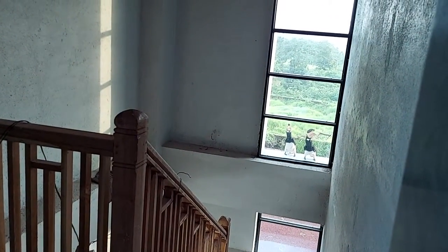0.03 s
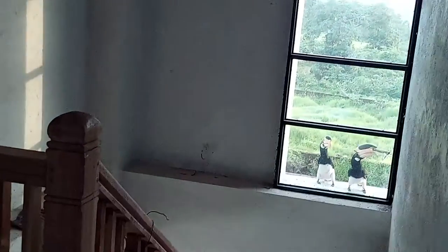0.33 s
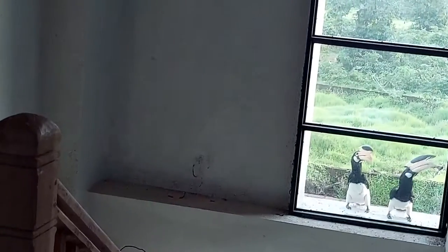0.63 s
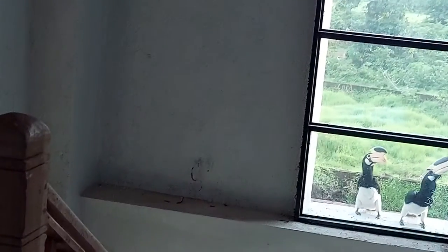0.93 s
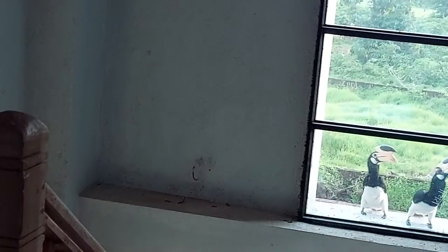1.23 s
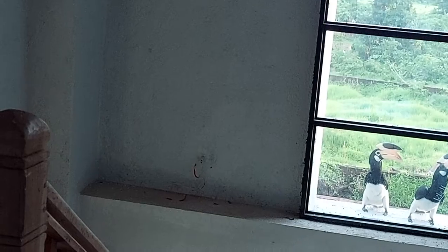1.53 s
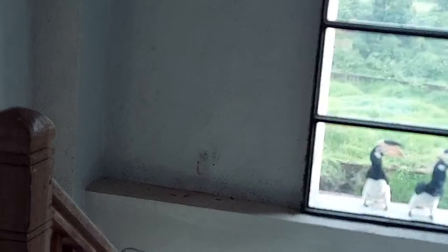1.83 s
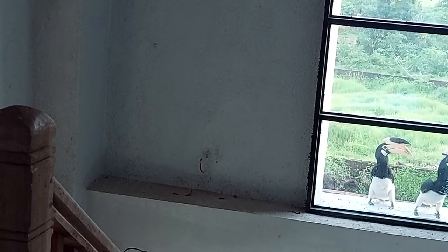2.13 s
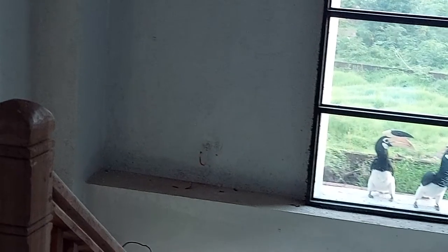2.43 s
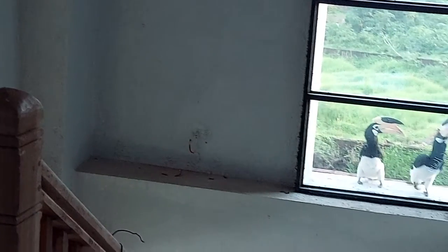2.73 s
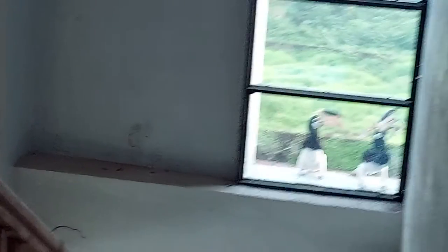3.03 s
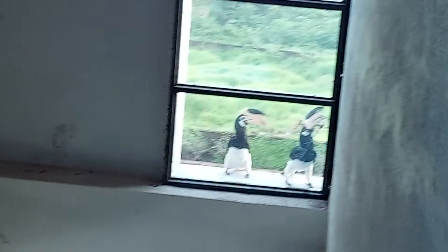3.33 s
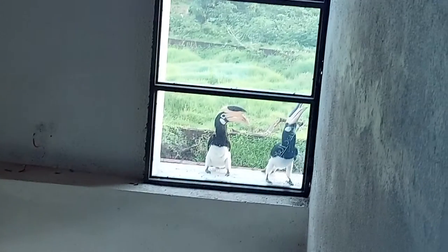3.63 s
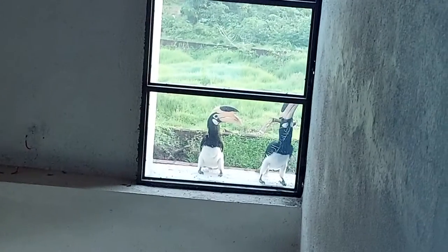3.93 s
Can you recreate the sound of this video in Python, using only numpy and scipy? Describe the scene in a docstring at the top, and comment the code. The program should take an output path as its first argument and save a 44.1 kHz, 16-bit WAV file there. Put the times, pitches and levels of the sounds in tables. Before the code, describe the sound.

Booming thuds ring through a concrete stairwell: first a dull thump, later a heavy rattling one like a door, and finally a sharp, close knock. Insects drone outside throughout, with a few faint bird chirps between the thuds.

```python
"""In a bare concrete stairwell, insects drone outside the window from start to finish: a low chorus
swells in waves over a steady high one. First a dull thump sets the stairwell ringing and dies away.
A faint bird chirps five times, then come a tiny click and two scuffs. Just after three seconds
a heavy rattling thud, like a door, booms through the stairwell. A sharp, nearer knock comes last."""
import sys
import numpy as np
from scipy import signal
from scipy.fft import rfft, irfft, next_fast_len
from scipy.io import wavfile
from scipy.ndimage import map_coordinates

SR = 44100
rng = np.random.default_rng(int(sys.argv[2]) if len(sys.argv) > 2 else 0)


def master(y):
    """Save y as 16-bit WAV."""
    cut = np.clip(np.atleast_2d(y).T, -1, 1)
    pcm = np.round(cut * 32767)  # scale
    wavfile.write(sys.argv[1], SR, pcm.astype(np.int16))


N = 176400
RING = 70000  # samples for one hit to die away
T = np.arange(RING) / SR  # seconds since a hit

# The stairwell's own tones. Each row: pitch in Hz, level in dB for the thump, level in dB for the thud,
# fade time in seconds. A fade time is how long a sound takes to drop by 60 dB.
ROOM_TONES = [(45, -9, -20, 1.56), (110.3, -43, -7, 1.1), (160.6, 0.5, -3, 1.49), (176.1, -15, -9, 1.24),
              (222.4, -23, -10, 1.3), (287, -6.5, -15.5, 1.7), (324.5, -9, -10, 0.64),
              (408.7, -26, -8.5, 0.57), (447, -7.5, -11, 0.46), (481.6, -33, -8.5, 1.02),
              (570.6, -18, -14.5, 0.81), (767, -23.5, -22, 1.3), (889, -40, -20, 0.92),
              (1047, -43, -20.5, 0.56), (1452, -51, -24.5, 0.85), (2554, -51, -25, 0.5),
              (3680, -53, -27, 0.68)]
# How long echoes last. Each row: frequency in Hz, fade time in seconds.
ECHO_FADE = [(60, 1.46), (250, 1.58), (700, 1.6), (1300, 1.3), (2400, 0.96), (5000, 1.08), (10000, 0.82)]
# How alike the echoes are in both ears. Each row: frequency in Hz, likeness (1 same, 0 unrelated).
ROOM_LIKENESS = [(60, 1), (140, 0.73), (300, .5), (640, 0.14), (1400, -.05), (6000, -0.011)]


def thuds():
    """The dull thump and the heavy thud each ring the same stairwell with a few quick hits."""
    # Each row: start in seconds, level in dB, treble boost in dB.
    thump_hits = [(0.001, -42.5, -12), (0.14, -62.5, 7)]
    thud_hits = [(3.254, -40, 9.5), (3.288, -31.5, 2), (3.36, -37, -10.5), (3.403, -34, -2.5),
                 (3.528, -44.5, 0.5), (3.635, -42.5, -24)]
    # Each row: frequency in Hz, relative strength in dB.
    thump_colour = [(24, -38), (45, -6), (65, -7.5), (110, -9), (165, -5), (220, -12.5), (295, 0.5),
                    (360, -17), (435, -6), (540, -25), (640, -12), (770, -18.5), (950, -25.5),
                    (1700, -27.5), (4000, -47), (12000, -46.5)]
    thud_colour = [(26, -59), (45, -19.5), (58, -20.5), (75, -17), (92, -19), (112, -11), (132, -7.5),
                   (170, -8), (270, -6), (500, -10), (640, -16), (800, -23.5), (900, -19), (1400, -21.5),
                   (1550, -26.5), (1850, -29.5), (2100, -24), (2600, -27.5), (3150, -33), (3400, -28),
                   (3800, -25.5), (4250, -33.5), (4480, -39), (4800, -34), (5200, -40), (5700, -44.5),
                   (7500, -45), (10000, -63), (15000, -67)]
    _, thump_db, thud_db, _ = np.transpose(ROOM_TONES)
    thump = ring_stairwell(thump_hits, thump_colour, thump_db)
    return thump + ring_stairwell(thud_hits, thud_colour, thud_db)


def ring_stairwell(hits, colour, tone_levels_db):
    """Each hit fills the stairwell with echoes and feeds energy into its ringing tones."""
    # Each row: frequency in Hz, dB louder on the left.
    balance = [(100, 3.5), (380, 0), (1000, -4.5), (4400, -1.5), (12000, 1)]
    build_s, beat_hz = 0.0066, 7.63
    out, feed, first = np.zeros((2, N)), np.zeros(RING), hits[0][0]
    for start, db, treble_db in hits:
        wash = echoes(colour, balance, hold_s=0, treble_db=treble_db, treble_from_hz=850)
        add(out, start, amp(db - 0.5) * (1 - np.exp(-T / build_s)) * wash)
        t = T - (start - first)
        feed += amp(2 * db) * (t >= 0) * np.exp(-np.abs(t) / build_s) / (build_s * SR)
    for (hz, _, _, fade_s), db in zip(ROOM_TONES, tone_levels_db):
        phase, apart = rng.random(2)
        kept_per_sample = amp(-60 / (fade_s * SR)) ** 2
        energy = signal.lfilter([1], [1, -kept_per_sample], feed)
        cycles = hz * T + phase
        # A weaker tone just above makes each tone pulse.
        neighbour = amp(-8) * np.sin(2 * np.pi * (cycles + beat_hz * (0.5 + apart) * T))
        pair = unit(np.sin(2 * np.pi * cycles) + neighbour)
        add(out, first, amp(db - 1.5) * np.sqrt(energy) * pair)
    return out


def knock():
    """Two near, bright hits, so close together that they sound like one."""
    # Each row: start in seconds, level in dB.
    hits = [(3.987, -25.5), (3.993, -19)]
    # Each row: frequency in Hz, relative strength in dB.
    colour = [(30, -35), (70, -27), (150, 11), (260, -2), (420, 2.5), (700, -9.5), (950, -11.5),
              (1400, -17), (2050, -11.5), (2800, -19), (3800, -14), (5500, -24), (8000, -24.5),
              (11000, -30.5), (15000, -36)]
    # Each row: frequency in Hz, dB louder on the left.
    balance = [(200, 0), (400, -5), (1300, 11), (2400, -6.5), (4400, 10.5), (8000, 14.5), (14000, 4)]
    rise_s, fade_s = 0.0018, 0.62
    out = np.zeros((2, N))
    for start, db in hits:
        loudness = amp(db - 60 * T / fade_s) * (1 - np.exp(-T / rise_s))
        add(out, start, loudness * noise(colour, ROOM_LIKENESS, balance, size=RING))
    return out


def scuffs():
    """Soft sliding strokes that linger in the stairwell."""
    # Each row: start in seconds, level in dB, treble boost in dB.
    strokes = [(2.92, -61, 2.5), (3.046, -58.5, -3.5)]
    # Each row: frequency in Hz, relative strength in dB.
    colour = [(60, -28), (130, -8), (200, -15), (400, -17), (800, -8.5), (1600, -8), (2100, 0.5),
              (2900, 3.5), (3700, -3), (4700, -5.5), (5900, -5.5), (8000, -18.5), (11000, -33),
              (15000, -34.5)]
    rise_s = 0.017
    out = np.zeros((2, N))
    for start, db, treble_db in strokes:
        rub = echoes(colour, [(3000, -3)], hold_s=0.02, treble_db=treble_db, treble_from_hz=5000)
        add(out, start, amp(db) * (1 - np.exp(-T / rise_s)) * rub)
    return out


def click():
    """A tiny click on the right, with no echo."""
    start_s, level_db, fade_s = 2.863, -65, 0.032
    t = np.maximum(np.arange(N) / SR - start_s, 0)
    snap = noise([(1500, 2), (4000, 3), (9000, -16), (15000, -15)], ROOM_LIKENESS, [(3000, -9)])
    return (t > 0) * amp(level_db - 60 * t / fade_s) * snap


def bird():
    """Faint, buzzy falling chirps from the right, blurred by the walls."""
    # Each row: start in seconds, starting pitch in Hz, level in dB.
    chirps = [(1.521, 5800, -74), (1.662, 5340, -76), (1.931, 5680, -78), (2.33, 5740, -76),
              (2.46, 5070, -75)]
    length_s, fall_hz_per_s = 0.077, 3000
    trill_hz, trills_per_s = 220, 85
    t = T[T < length_s]
    out = np.zeros((2, N))
    for start, hz, db in chirps:
        pitch = hz - fall_hz_per_s * t + trill_hz * np.sin(2 * np.pi * trills_per_s * t)
        note = np.sin(np.pi * t / length_s) * np.sin(2 * np.pi * np.cumsum(pitch) / SR)
        echo = rng.standard_normal((2, SR // 2)) * amp(-60 * T[:SR // 2] / value_at(ECHO_FADE, hz))
        echo /= np.linalg.norm(echo[0])
        add(out, start, amp(db) * signal.fftconvolve(note[None], echo, axes=1))
    return out * amp([[-2], [2]])


def insects():
    """Many insects blend into a low rasp that swells in waves and a steady high drone."""
    # Each row: frequency in Hz, relative strength in dB.
    low_colour = [(2800, -50), (3250, -24.5), (3550, -7.5), (3820, 3), (4000, 2.5), (4190, 2),
                  (4330, -20.5), (4700, -21.5), (5500, -73)]
    high_colour = [(5000, -35), (6000, -20), (6350, -9), (6750, -8.5), (7050, -4.5), (7520, 0), (7700, -7),
                   (7980, -11), (8150, -20.5), (8850, -20.5), (9200, -44)]
    # Each row: middle of a wave in seconds, half its length in seconds, rise in dB.
    waves = [(0.387, 0.29, 6), (1.154, .2, 6.5), (1.707, 0.17, 4.5), (2.26, 0.2, 6), (2.756, 0.12, 5.5),
             (3.292, 0.4, 6), (3.865, 0.17, 8)]
    t = np.arange(N) / SR
    swell_db = sum(db * np.exp(-((t - middle) / half) ** 2) for middle, half, db in waves)
    rasp = unit(amp(wobble(per_s=99)) * noise(low_colour, [(4000, 0.039)], [(4000, -4)]))
    drone = amp(-74 + 1.1 * wobble(per_s=3)) * noise(high_colour, [(7000, -0.04)], [(7000, -2)])
    return amp(-73.5 + swell_db) * rasp + drone


def air():
    """Distant outdoor rumble from the window on the right, and a thin hiss."""
    # Each row: frequency in Hz, relative strength in dB.
    rumble_colour = [(20, -29), (35, -13.5), (60, -2), (110, 1), (160, -6), (215, 0), (260, -6.5),
                     (320, -3), (400, -10), (500, -11.5), (630, -9), (800, -16.5), (1050, -20.5),
                     (1310, -15), (1500, -23), (1700, -25.5), (1980, -19), (2400, -29), (3100, -35.5),
                     (4500, -76)]
    hiss_colour = [(1000, -13.5), (3000, -0.5), (5500, -5), (8000, -5.5), (9300, 0), (12000, 3), (15500, 4)]
    # Each row: frequency in Hz, dB louder on the left (negative means right).
    balance = [(60, -2.5), (250, -8), (700, -9.5), (1300, -13), (2000, -10.5), (2800, -0.5)]
    likeness = [(80, 0.4), (400, 0.61), (2000, 0.11)]
    rumble = amp(-63.5 + 0.78 * wobble(per_s=6)) * noise(rumble_colour, likeness, balance)
    hiss = amp(-82) * noise(hiss_colour, [(5000, 0)], [(3000, 7), (5500, -6.5), (9000, 1.5)])
    return rumble + hiss


def echoes(colour, balance, hold_s, treble_db, treble_from_hz):
    """A blur of echoes that holds, then fades at the stairwell's speed for each frequency."""
    hz, t, slices = signal.stft(noise(colour, ROOM_LIKENESS, balance, size=RING), SR, nperseg=512)
    hz = hz[:, None]
    fade_db = -60 * np.maximum(t - hold_s, 0) / value_at(ECHO_FADE, hz)
    bright_db = treble_db * hz ** 2 / (hz ** 2 + treble_from_hz ** 2)
    return signal.istft(slices * amp(fade_db + bright_db), SR, nperseg=512)[1][:, :RING]


def noise(colour, likeness, balance, size=N):
    """Stereo noise shaped by three tables over frequency: strength, ear likeness and lean to the left."""
    hz = np.fft.rfftfreq(size, 1 / SR)
    width = np.arccos(np.clip(value_at(likeness, hz), -1, 1)) / 2
    shaped = rfft(rng.standard_normal((2, size))) * amp(value_at(colour, hz))
    mid, side = shaped * [np.cos(width), np.sin(width)]
    lean = amp(value_at(balance, hz) / 2)
    return unit(irfft(np.array([(mid + side) * lean, (mid - side) / lean]), size))


def wobble(per_s):
    """A smooth curve through per_s random points a second."""
    return map_coordinates(rng.standard_normal(2000), [np.arange(N) * per_s / SR], mode="wrap")


def value_at(table, hz):
    """Read a table at any frequency, sliding between its rows."""
    row_hz, values = np.transpose(table)
    return np.interp(np.log(hz + 1), np.log(row_hz + 1), values)


def amp(db):
    """Turn decibels into a multiplier."""
    return 10 ** (np.asarray(db) / 20)


def unit(x):
    """Scale x to an average power of 1."""
    return x / np.sqrt(np.mean(x ** 2) + 1e-20)


def add(out, start_s, x):
    """Mix x into out, beginning at start_s."""
    start = int(round(start_s * SR))
    part = x[..., :N - start]
    out[:, start:start + part.shape[-1]] += part


def scene():
    """Everything heard from the stairs."""
    return thuds() + knock() + click() + scuffs() + bird() + insects() + air()


def record(dry):
    """Cut away the very highest treble."""
    top_hz, edge_hz = 15900, 250
    size = next_fast_len(N + 8192)
    hz = np.fft.rfftfreq(size, 1 / SR)
    let_through = 0.5 - 0.5 * np.tanh((hz - top_hz) / edge_hz)
    return irfft(rfft(dry, size) * let_through, size)[..., :N]


dry = scene()
out = record(dry)
master(out)
```